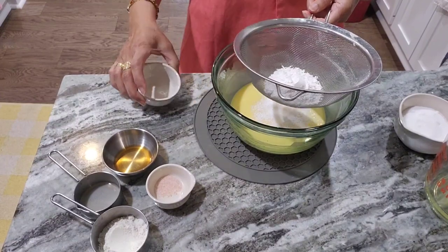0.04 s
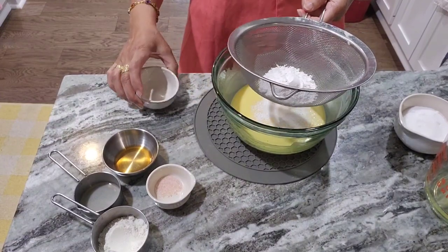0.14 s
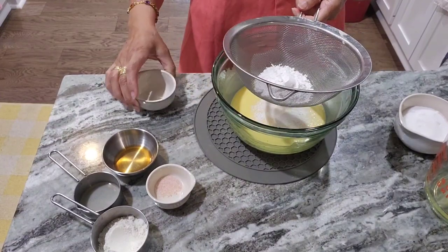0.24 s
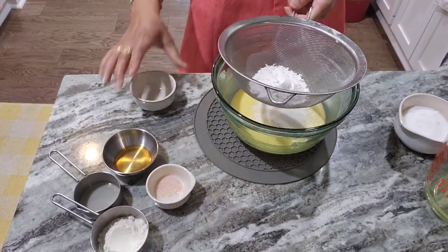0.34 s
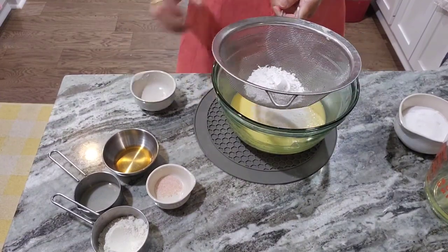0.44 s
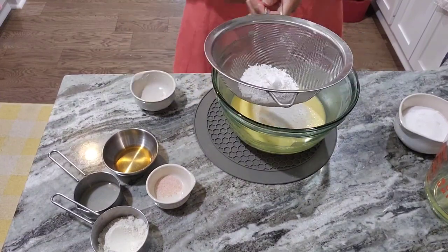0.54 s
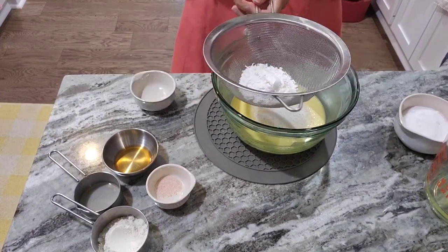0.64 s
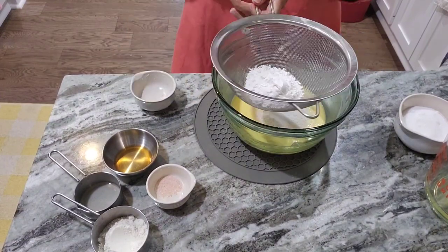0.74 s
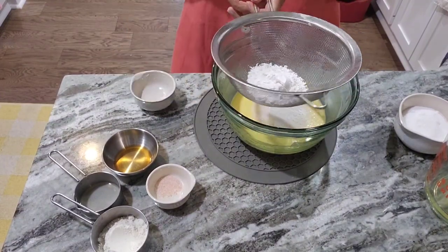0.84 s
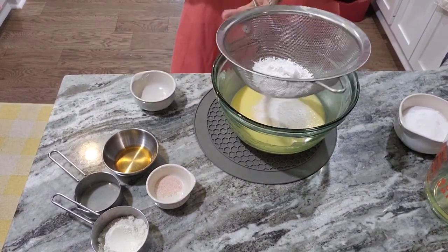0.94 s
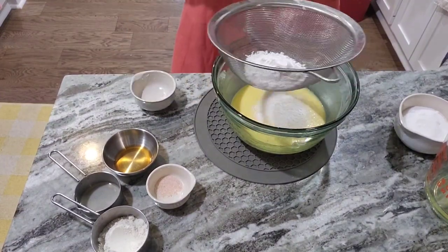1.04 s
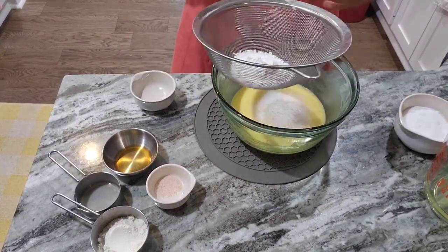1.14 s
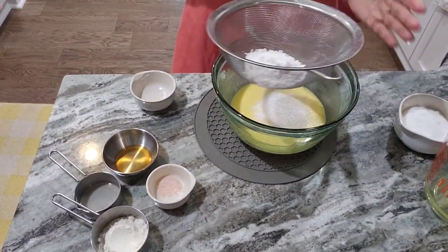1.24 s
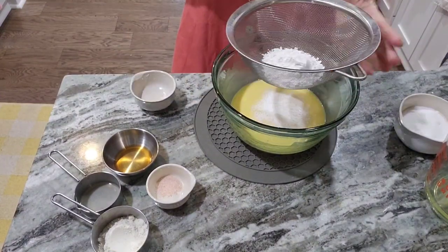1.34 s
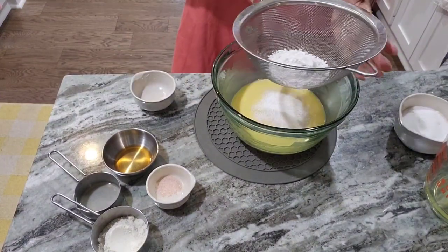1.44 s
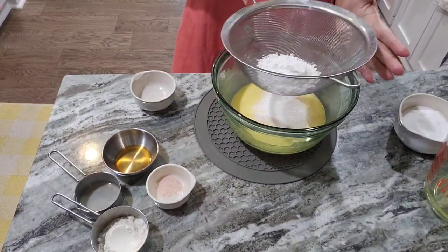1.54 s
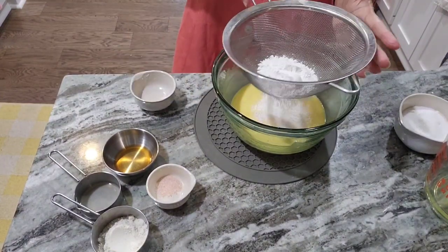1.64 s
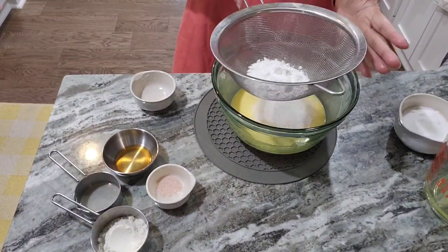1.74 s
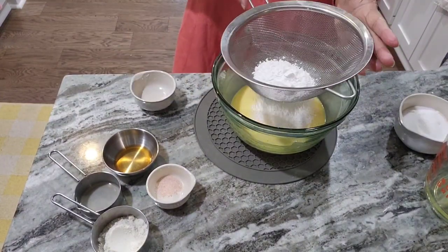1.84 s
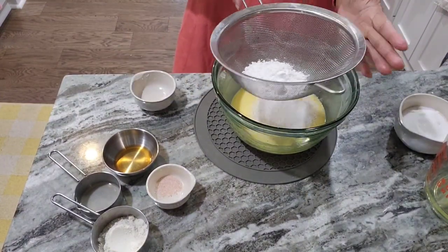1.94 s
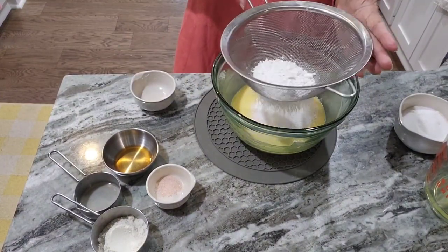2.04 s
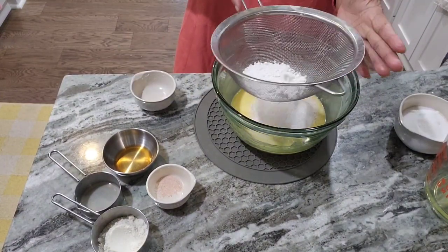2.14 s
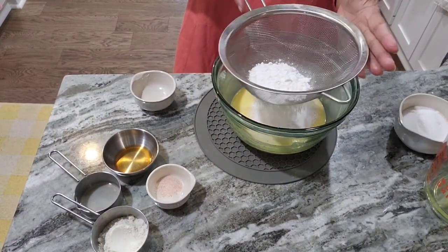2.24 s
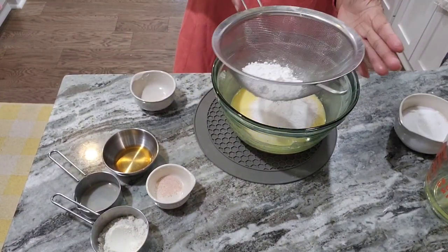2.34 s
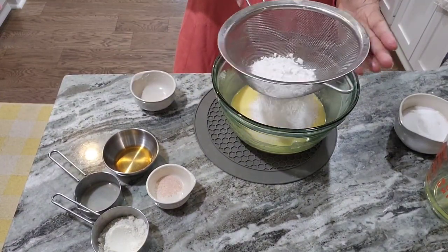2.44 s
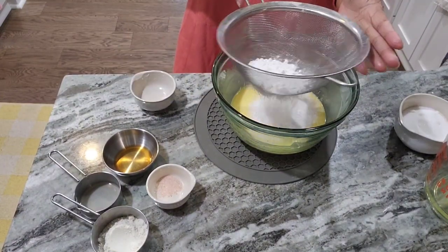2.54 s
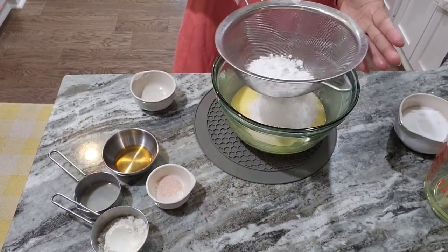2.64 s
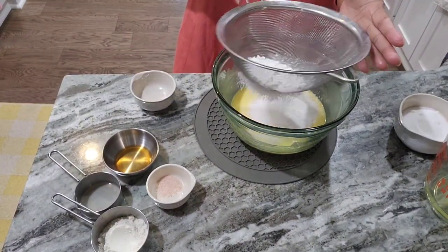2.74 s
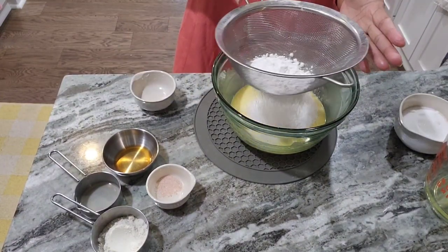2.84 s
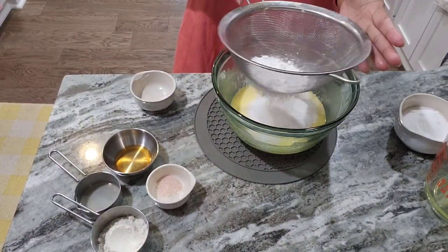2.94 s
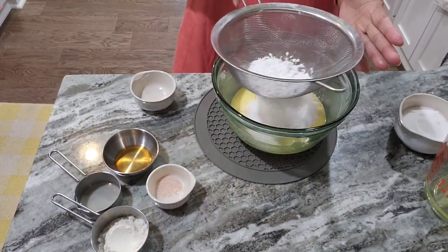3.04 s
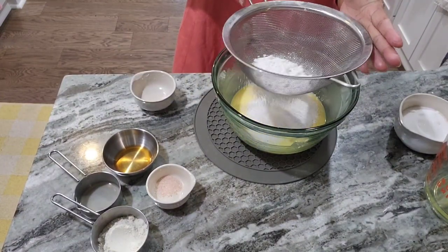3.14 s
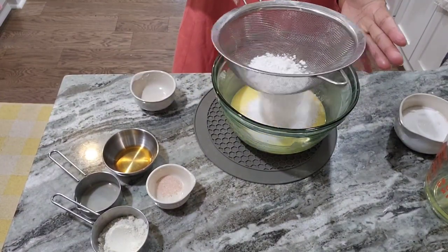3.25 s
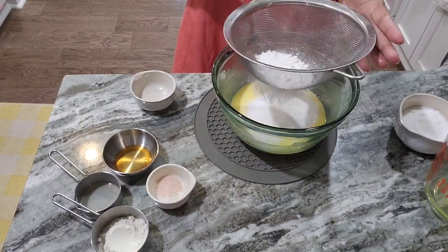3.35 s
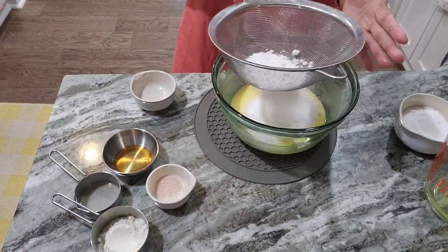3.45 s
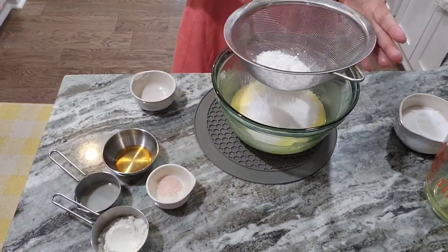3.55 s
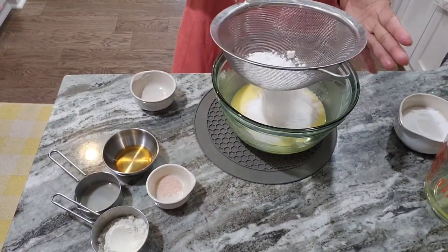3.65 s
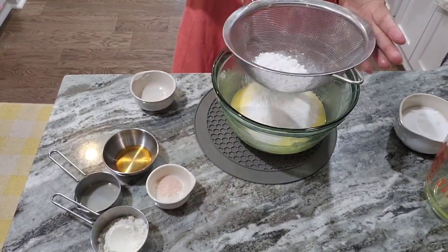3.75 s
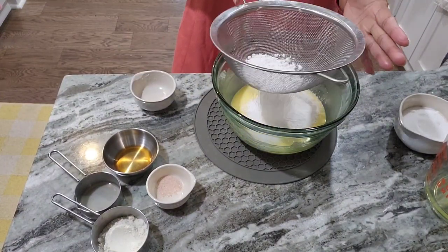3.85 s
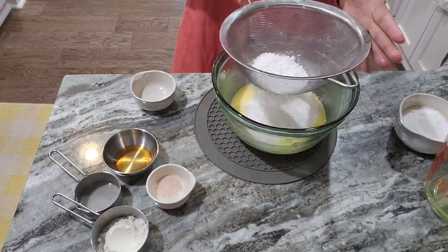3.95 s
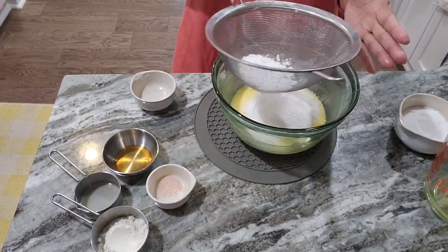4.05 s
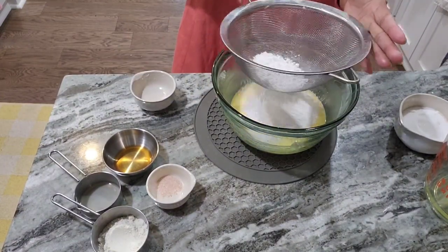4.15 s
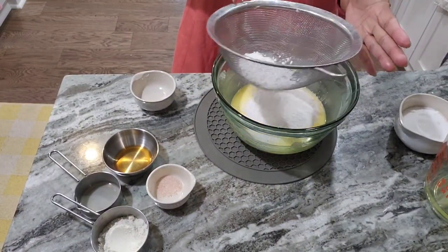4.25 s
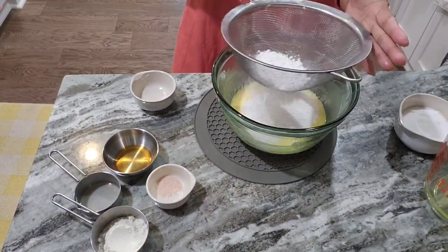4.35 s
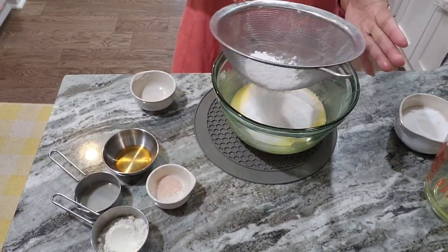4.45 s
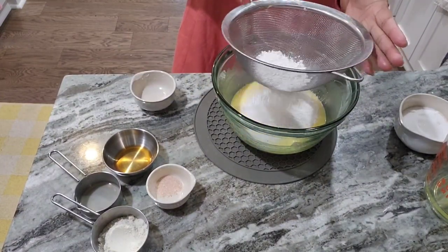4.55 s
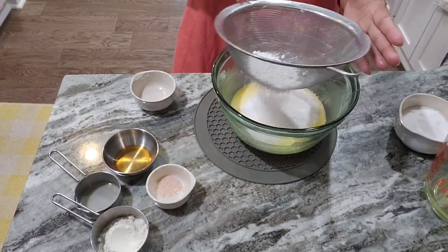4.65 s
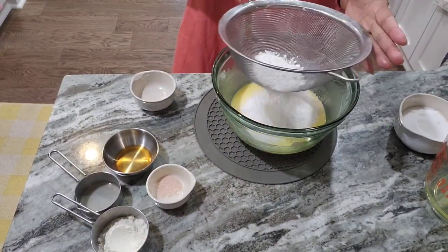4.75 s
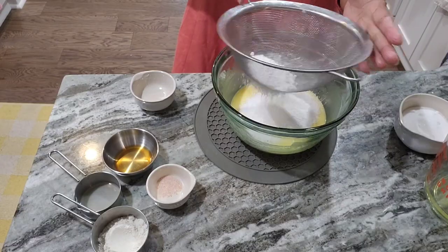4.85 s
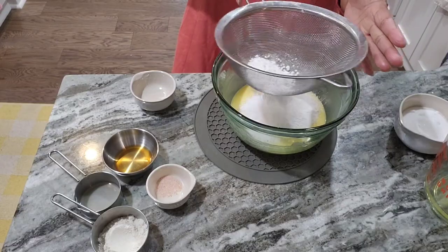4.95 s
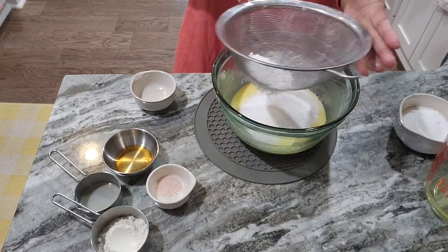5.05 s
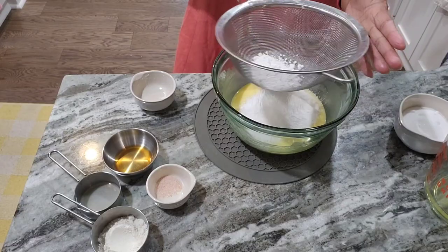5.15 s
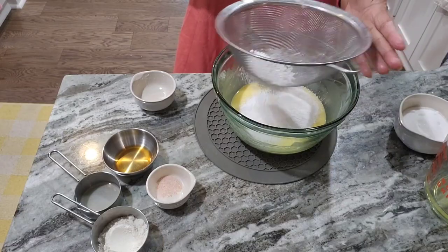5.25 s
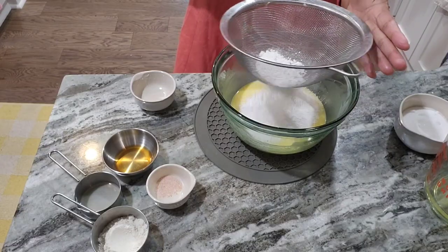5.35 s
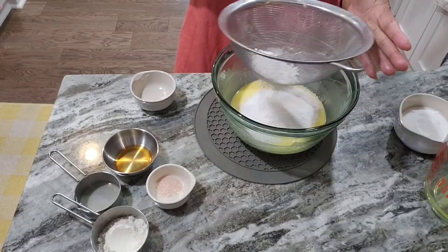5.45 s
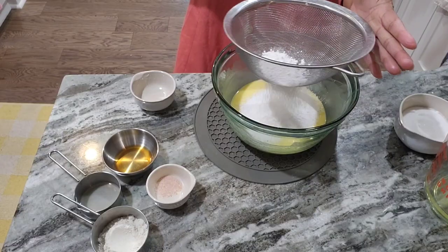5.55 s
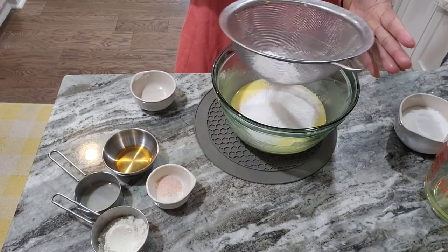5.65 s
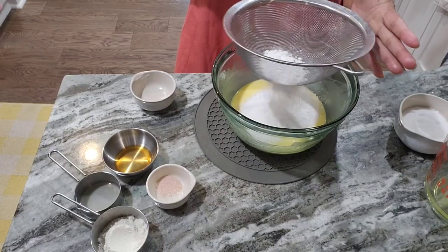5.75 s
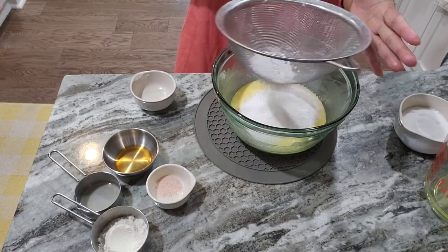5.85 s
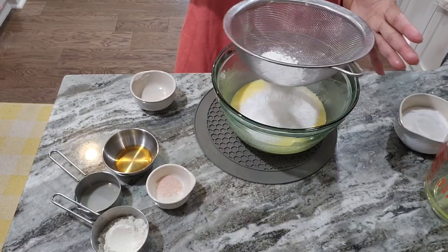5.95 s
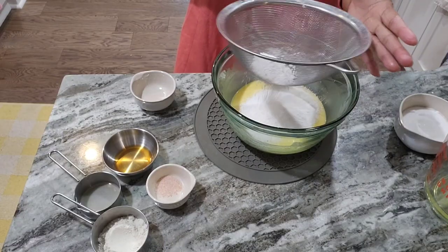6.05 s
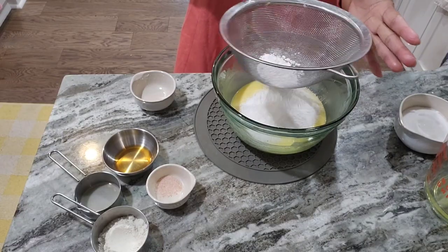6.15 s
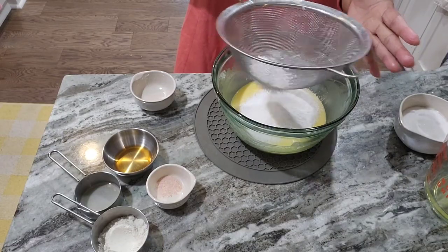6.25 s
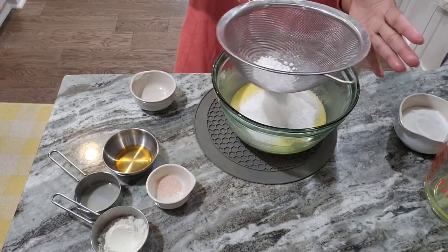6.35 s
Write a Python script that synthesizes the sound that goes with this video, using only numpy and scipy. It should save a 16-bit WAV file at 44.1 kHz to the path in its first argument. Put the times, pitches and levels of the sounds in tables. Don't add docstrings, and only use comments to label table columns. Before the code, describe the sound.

In a small kitchen with low fridge and fan hum, a little ceramic bowl is put down on a stone counter, knocking, rocking in a fast clatter and ringing briefly to the left. Afterwards a metal sieve is shaken close by, giving very faint, airy grain hisses about five times a second, with rare tiny ticks. Close stereo phone microphone.

```python
import sys
import numpy as np
from scipy import signal
from scipy.fft import rfft, irfft
from scipy.io import wavfile
from scipy.ndimage import uniform_filter1d

SR = 44100
rng = np.random.default_rng(int(sys.argv[2]) if len(sys.argv) > 2 else 0)


def attenuation_scalar(level_db):
    decades = np.asarray(level_db, float) / 20
    return 10 ** decades


def wav_record(signal):
    frames = np.transpose(np.atleast_2d(signal))
    bounded = np.clip(frames, -1, 1)
    quanta = np.round(bounded * 32767).astype(np.int16)
    wavfile.write(sys.argv[1], SR, quanta)


N = 282240


def level(x, db):
    return x * attenuation_scalar(db) / np.sqrt(np.mean(x ** 2))


def along(table, hz):
    f, value = np.transpose(table)
    return np.interp(np.log(hz + 1), np.log(f + 1), value)


def colour(table, size):
    hz = np.fft.rfftfreq(size, 1 / SR)
    inside = (hz > table[0][0]) & (hz < table[-1][0])
    return attenuation_scalar(along(table, hz) - 60 * ~inside)


def stereo_noise(size, like):
    mid, side = rfft(rng.standard_normal((2, size)))
    mid, side = mid * np.sqrt(1 + like), side * np.sqrt(1 - like)
    return np.array([mid + side, mid - side])


def noise(table, like):
    return level(irfft(colour(table, N) * stereo_noise(N, like), N), 0)


def walk(rate_hz):
    hold = int(SR / rate_hz)
    steps = np.repeat(rng.standard_normal(N // hold + 1), hold)
    return 1.3 * uniform_filter1d(uniform_filter1d(steps, hold), hold)[:N]


def delay(x, s):
    return irfft(rfft(x) * np.exp(-2j * np.pi * np.fft.rfftfreq(N, 1 / SR) * s), N)


def crack(table):
    cepstrum = irfft(np.log(colour(table, 1024)))
    cepstrum[1:512] *= 2
    cepstrum[513:] = 0
    return irfft(np.exp(rfft(cepstrum)))[:512]


def strike(times, dbs, table):
    clicks = np.zeros(N)
    clicks[(times * SR).astype(int)] = attenuation_scalar(dbs)
    return signal.fftconvolve(clicks, crack(table))[:N]


# f/Hz, level/dB per Hz
HUM = [(15, -48.5), (25, -26), (42, -14), (64, 3), (88, -6), (115, 3.5), (136, -5), (155, 2.5), (177, -9.5),
       (200, -4), (230, -13.5), (255, -18), (420, -23.5), (600, -54.5)]
# f/Hz, level/dB per Hz
AIR = [(180, -32), (300, -5.5), (523, -3.5), (610, -1), (662, -5.5), (719, -1.5), (780, -9), (958, -9.5),
       (1350, -22), (1890, -28.5), (3500, -42.5), (4550, -71.5), (7700, -120)]
# f/Hz, level/dB per Hz
HISS = [(1470, -33.5), (2500, -5), (3640, -6), (4830, -3.5), (5850, -5.5), (6670, -4.5), (9630, -8),
        (12100, -2.5), (13600, 0), (15600, -5)]
# f/Hz, left-right correlation
LIKENESS = [(60, 0.97), (130, 0.92), (290, 0.81), (640, .35), (1410, -0.2), (3100, -.05), (15000, 0.62)]


def appliances():
    like = np.clip(along(LIKENESS, np.fft.rfftfreq(N, 1 / SR)), -.9, .98)
    hum = attenuation_scalar(-47 + 0.5 * walk(1.7)) * noise(HUM, like)
    air = attenuation_scalar(-63 + 0.96 * walk(4.7) + 0.54 * walk(17)) * noise(AIR, like)
    return hum + air + attenuation_scalar(-83.5) * noise(HISS, 0.)


def modes(table, times, dbs):
    contact_s, surviving = 0.0003, .45
    out, t = np.zeros((2, N)), np.arange(SR)[None] / SR
    hz, db, t60, pan = np.transpose(table)[:, :, None]
    touch = 1 - np.exp(-(t / contact_s) ** 2)
    for s, hit_db in zip(times, dbs):
        share = attenuation_scalar(1.2 * rng.standard_normal((len(table), 1)))
        decay = attenuation_scalar(hit_db + db - 60 * t / t60)
        tones = touch * share * decay * np.sin(2 * np.pi * hz * t)
        i = int(s * SR)
        out[:, i:i + SR] *= 1 - (1 - surviving) * touch * attenuation_scalar(hit_db - max(dbs))
        out[:, i:i + SR] += [(tones * attenuation_scalar(pan / 2)).sum(0), (tones * attenuation_scalar(-pan / 2)).sum(0)]
    return out


# t/s, blow level/dB, ring level/dB, sharpness level/dB, thud level/dB
KNOCKS = [(0.2806, -21.5, -24.5, -9.5, 2), (0.281, -9, -19, -10, 3), (0.4408, -18, 4.5, -5, -9),
          (0.4444, -10.5, 2, 7, -5.5), (.449, -11.5, 4, -0.5, -8), (0.4523, -17, -7.5, -5, -8.5),
          (.486, -9, -1, 5.5, -0.5), (0.4904, -20, -3, -4, -5.5), (.5006, -11.5, -1.5, -2, 3),
          (.50462, -18.5, -4, -3, 2), (.52207, -20.5, -5.5, -3, -2), (0.666, -54.5, 5, 11, -16)]
# f/Hz, level/dB per Hz
BLOW = [(150, -30), (250, -8), (560, -2.5), (800, -4.5), (1050, -3), (1890, -2.5), (3000, -4), (3500, -4.5),
        (4400, -14), (5800, -19), (6800, -33), (8500, -62.5)]
# f/Hz, level/dB per Hz
EDGE = [(3500, -33), (5000, -17.5), (7000, -21.5), (8000, -21.5), (8650, -35.5), (9100, -60.5),
        (10000, -42), (12000, -42.5), (13000, -54), (13700, -38), (14400, -51), (14700, -75)]
# f/Hz, level/dB, t60/s, left minus right level/dB
THUD = [(103, -35, .12, 1), (160.9, -31, .1, 0.5), (212, -30.5, 0.2, 0), (570, -27, 0.14, -1),
        (1529, -25.5, 0.013, -0.5), (1896, -16.5, 0.01, -1.5), (3250, -15, 0.01, -8.5)]
RING_HZ = [1830, 1920, 2125, 3341, 3492, 3501, 3970, 5330, 5730]
# level/dB, t60/s, left minus right level/dB
RING = [(-28, .13, -0.5), (-33, .12, -0.5), (-33, .12, 0), (-20.5, 0.5006, -9), (-19.5, 0.73, 4),
        (-28, .9, -4), (-36, .08, 0), (-32, .2, 1.5), (-40, .07, 0)]
SHRILL_HZ = [7880, 13742, 13600]
# level/dB, t60/s, left minus right level/dB
SHRILL = [(-40, .12, -2), (-37.5, .2, 4), (-46, 0.079, 4)]


def bowl():
    hand_s, hand_t60_s = 0.64, 0.12
    s, blow_db, ring_db, sharp_db, thud_db = np.transpose(KNOCKS)
    cracks = strike(s, blow_db, BLOW) + strike(s, blow_db + sharp_db, EDGE)
    thuds = modes(THUD, s, blow_db + thud_db)
    rings = modes(np.c_[RING_HZ, RING], s, blow_db + ring_db)
    rings = rings + modes(np.c_[SHRILL_HZ, SHRILL], s, blow_db + sharp_db)
    since_touch = np.clip(np.arange(N) / SR - hand_s, 0, None)
    return attenuation_scalar(17.5) * cracks + thuds, attenuation_scalar(-60 * since_touch / hand_t60_s) * rings


# f/Hz, t60/s
ROOM = [(125, 0.19), (350, 0.33), (1000, 0.45), (2200, 0.53), (3800, 0.43), (7000, .42), (12000, 0.34)]
# delay t/s, left level/dB, right level/dB
ECHOES = [(.0006, -7, -4.5), (.0013, -9, -5.5), (.0035, -9, -13), (.0075, -11, -11.5), (0.0117, -9, -6.5),
          (.0205, -14.5, -11)]


def kitchen(x):
    tail_db, build_s, wall_hz = -30.5, 0.0022, 4530
    t, hz = np.arange(SR) / SR, np.fft.rfftfreq(SR, 1 / SR)
    diffuse = stereo_noise(SR, np.clip(along(LIKENESS, hz), -.9, .95))
    tail = np.zeros((2, SR))
    for k, (centre, t60) in enumerate(ROOM):
        share = along([(f, 1. * (j == k)) for j, (f, _) in enumerate(ROOM)], hz)
        tail += irfft(share * diffuse, SR) * attenuation_scalar(tail_db - 60 * t / t60)
    tail *= 1 - np.exp(-t / build_s)
    walls = np.zeros((2, SR))
    for s, *dbs in ECHOES:
        walls[:, int(s * SR)] = attenuation_scalar(dbs)
    walls = signal.sosfilt(signal.butter(2, wall_hz, fs=SR, output="sos"), walls)
    return signal.fftconvolve(x, tail + walls, axes=1)[:, :N]


# fullest flow t/s, fine hiss level/dB, rise t/s (short for a tap, long for a shake)
SWINGS = [(.665, -73, .06), (.905, -75, .06), (1.04, -80.5, .08), (1.24, -83, 0.11), (1.45, -85, .1),
          (1.615, -75.5, 0.034), (1.81, -82, 0.037), (1.99, -74.5, .03), (2.2, -73.5, 0.029),
          (2.39, -78, 0.053), (2.58, -72.5, 0.032), (2.775, -75, .08), (2.985, -74.5, 0.13),
          (3.18, -75.5, 0.094), (3.34, -73.5, 0.079), (3.54, -74, 0.1), (3.72, -73.5, .09),
          (3.93, -73.5, 0.084), (4.12, -75, 0.096), (4.31, -74.5, .11), (4.525, -74, .12),
          (4.71, -74.5, .12), (4.88, -75, .1), (5.06, -74.5, 0.069), (5.28, -75.5, 0.075),
          (5.475, -76, .09), (5.69, -78.5, 0.091), (5.885, -75.5, .08), (6.1, -78.5, 0.11),
          (6.295, -80, .09)]


def flow(fall_s):
    depth_db, trickle_db = 15, -97
    roundness = 1.7
    s, peak_db, rise_s = np.transpose(SWINGS)
    t = np.arange(0, N, 32)[:, None] / SR - s
    drop = np.where(t < 0, np.abs(t / rise_s) ** roundness, t / fall_s)
    power = attenuation_scalar(2 * (peak_db - depth_db * drop)).sum(1) + attenuation_scalar(2 * trickle_db)
    return uniform_filter1d(np.repeat(10 * np.log10(power), 32)[:N], size=700)


# f/Hz, level/dB per Hz
FINE = [(8500, -14), (10000, -8.5), (11500, 0), (13000, -0.5), (14500, -5), (15700, -4.5)]
# f/Hz, level/dB per Hz
COARSE = [(2000, -16), (4000, -14), (5500, -12), (6300, -3.5), (8000, -2), (9300, -5), (10500, -10.5)]
# t/s, level/dB, half length t/s
RUBS = [
    (0.825, -78, .05),
    (1.858, -83.5, 0.051),
    (2.82, -80, 0.058),
    (3.833, -82, 0.098),
    (4.846, -79, 0.068),
    (5.84, -82, 0.027),
    (6.353, -95, .04),
]
# f/Hz, level/dB per Hz
RUB = [(4800, -9), (5800, -16), (6300, -3), (7000, -9), (7800, -17), (8800, -32)]
# t/s, level/dB
TICKS = [
    (1.572, -52),
    (1.99, -60),
    (5.043, -62),
    (5.8775, -41),
    (5.879, -38),
    (5.8803, -41),
    (5.882, -45),
]
# f/Hz, level/dB per Hz
TICK = [(7000, -36), (10000, -20), (12500, -6), (14500, 0), (15700, 7)]


def sieve():
    t = np.arange(N) / SR
    fine_db = flow(.08)
    coarse_db = flow(0.082) - 2.5 + 1.233 * walk(25)
    grains = attenuation_scalar(1.5 * walk(400) + .8 * walk(60))
    flour = grains * (attenuation_scalar(fine_db) * noise(FINE, 0.0942) + attenuation_scalar(coarse_db) * noise(COARSE, .1))
    rubbing = sum(attenuation_scalar(db) * np.exp(-((t - at) / half) ** 2) for at, db, half in RUBS)
    at, tick_db = np.transpose(TICKS)
    return flour * attenuation_scalar([[-.8], [1.2]]) + rubbing * noise(RUB, .1) + strike(at, tick_db, TICK)


def scene():
    port_lag_s, ring_send_db = 0.00017, -10
    blows, rings = bowl()
    near = blows + rings
    room = kitchen(blows + attenuation_scalar(ring_send_db) * rings)
    return np.array([near[0], delay(near[1], port_lag_s)]) + room + sieve() + appliances()


def roll_off(x):
    return signal.sosfilt(signal.butter(12, 15760, fs=SR, output="sos"), x)


def record(dry):
    return roll_off(dry)


dry = scene()
out = record(dry)
wav_record(out)
```